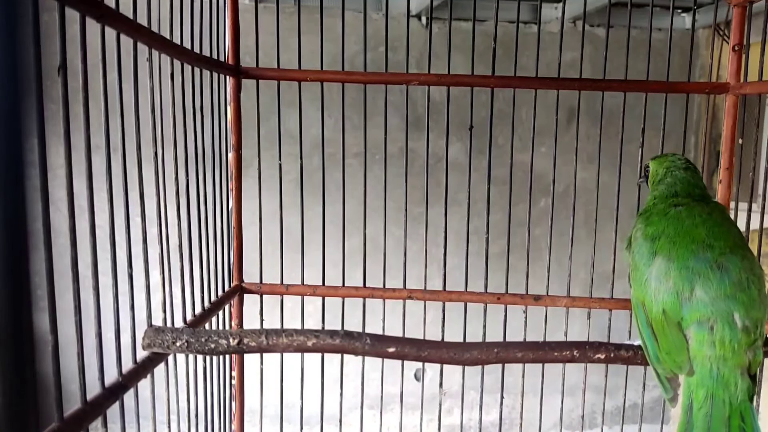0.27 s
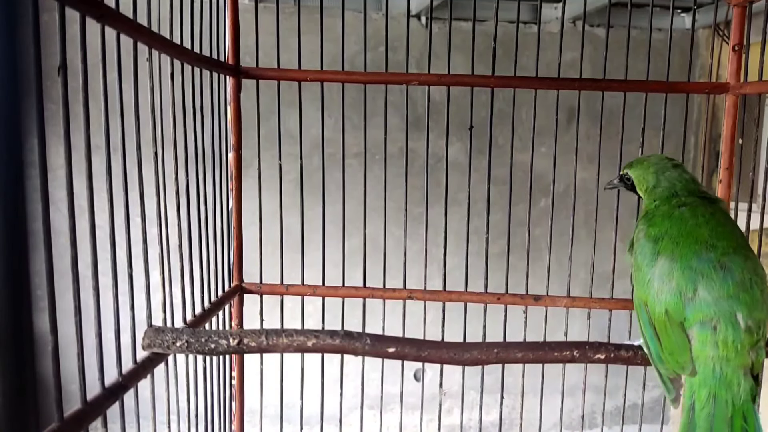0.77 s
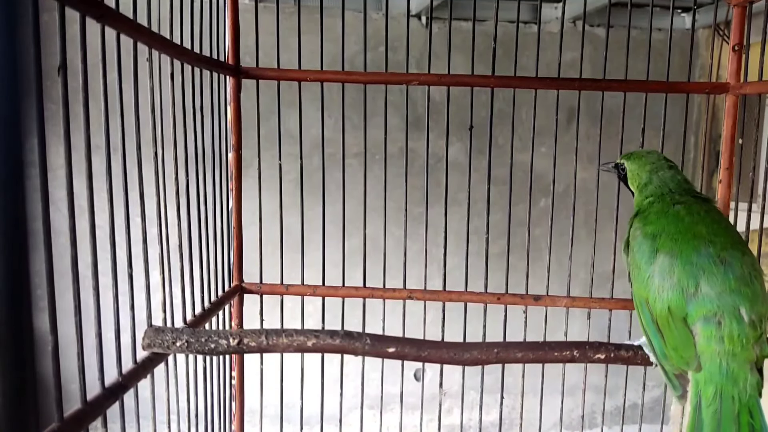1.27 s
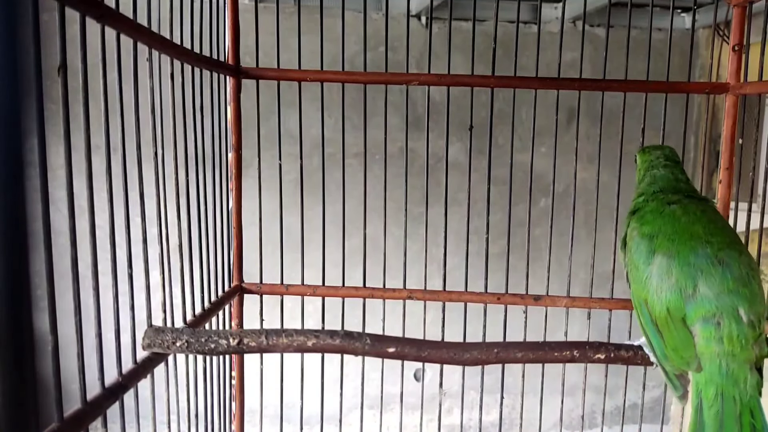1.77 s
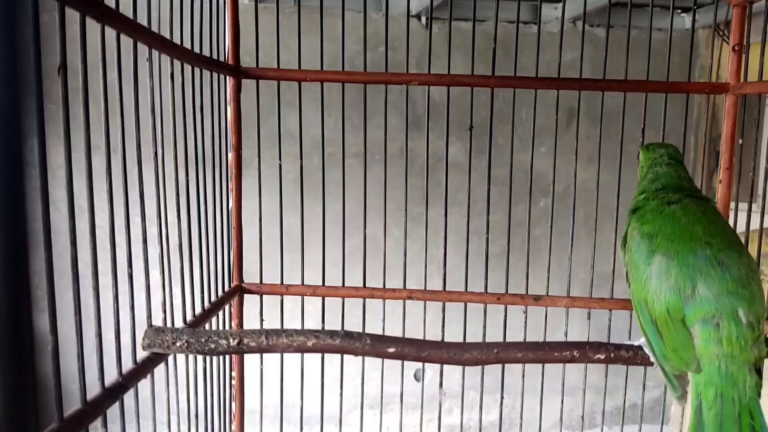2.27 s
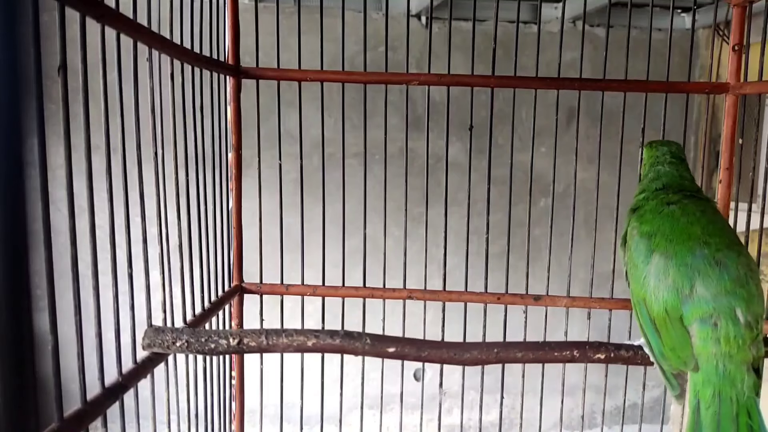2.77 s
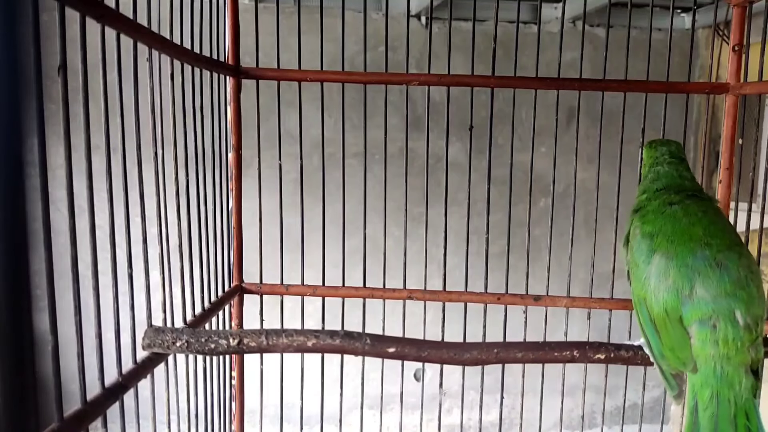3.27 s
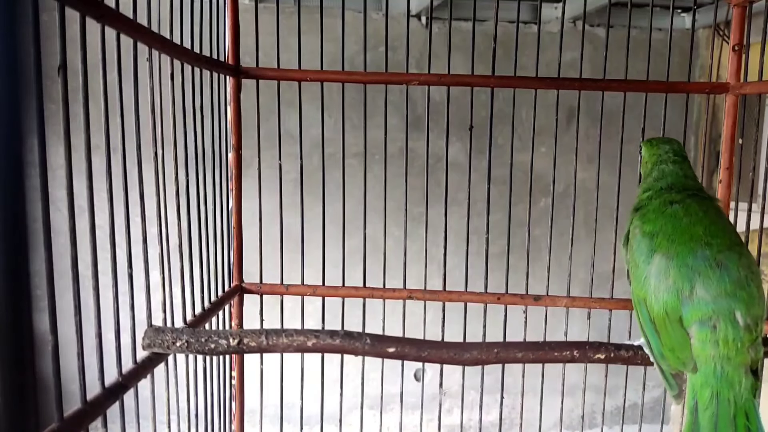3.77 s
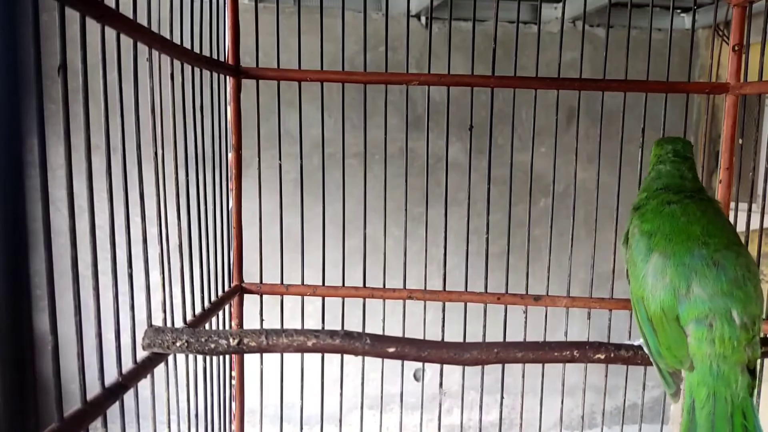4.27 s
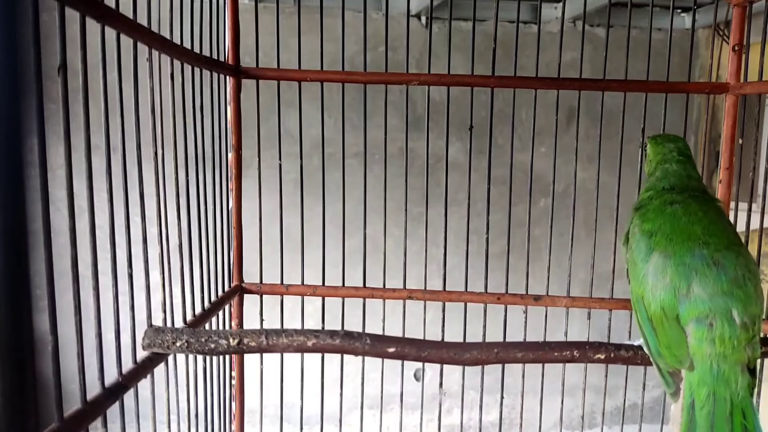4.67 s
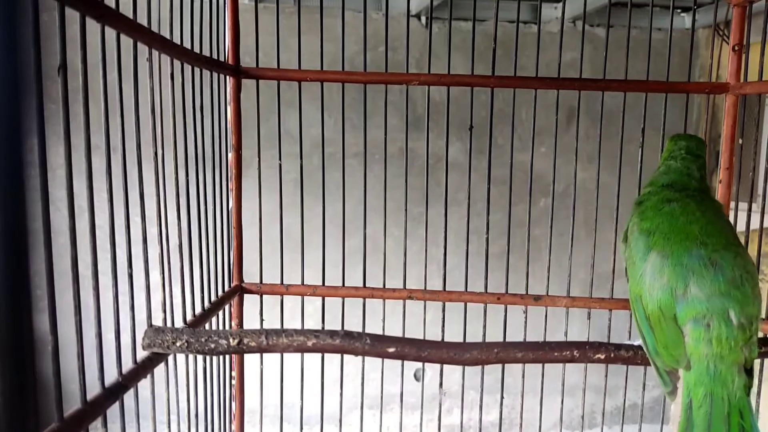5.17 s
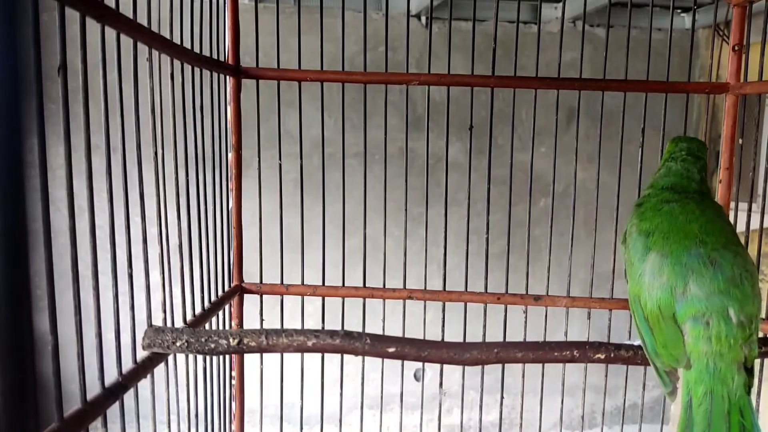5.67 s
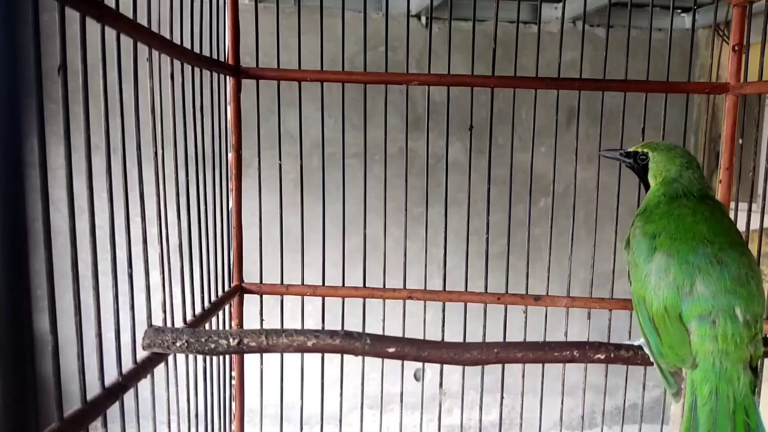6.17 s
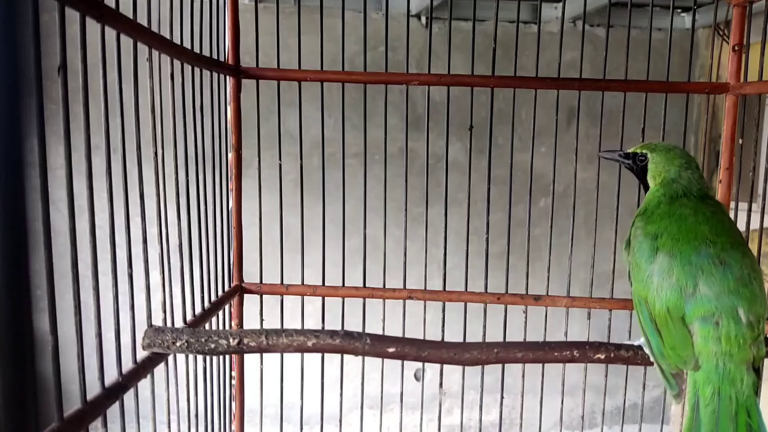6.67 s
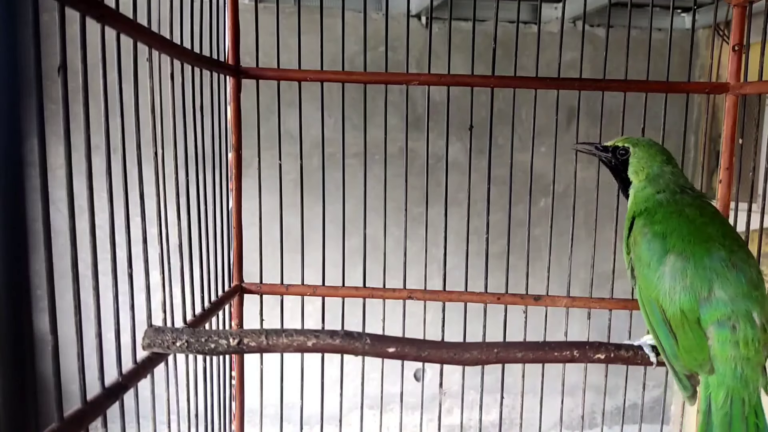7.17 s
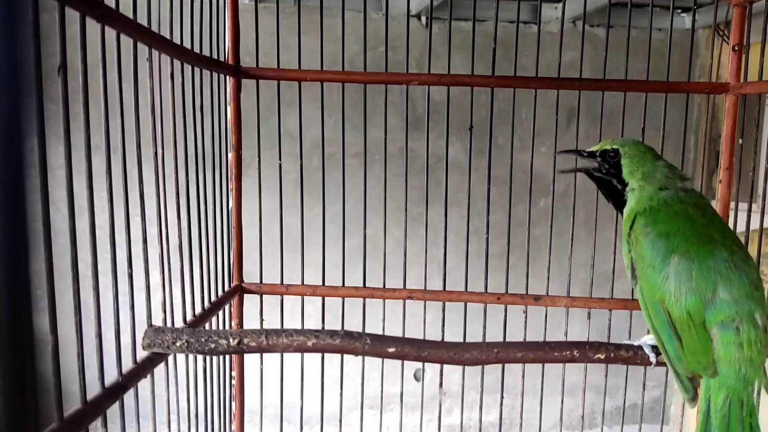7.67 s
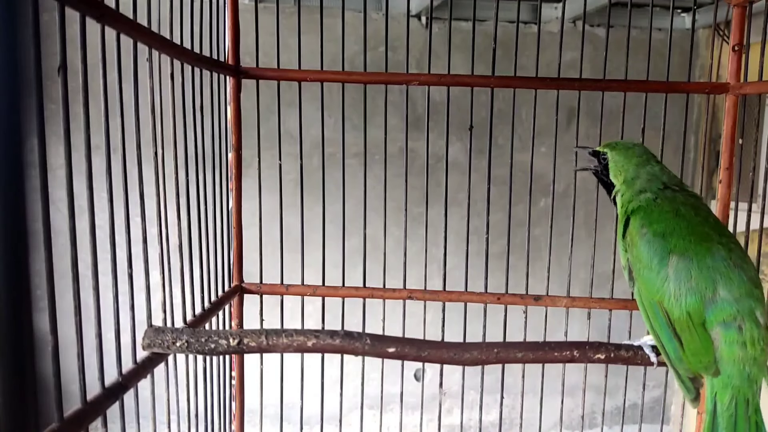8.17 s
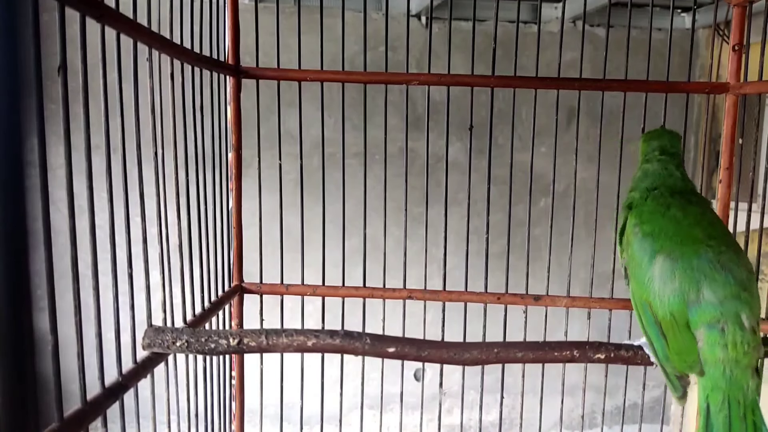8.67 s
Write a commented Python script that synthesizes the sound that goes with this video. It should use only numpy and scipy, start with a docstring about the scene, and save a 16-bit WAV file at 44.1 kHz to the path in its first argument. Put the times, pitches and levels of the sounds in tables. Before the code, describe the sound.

Close bird song on a quiet porch: a chip, a steady string of short chups, silence, a plunging squeal, then fast loud upward double whistles.

```python
"""Caged leafbird on a porch

A leafbird sings close to the microphone: a sharp chip, eight short arched chups, a pause, a squeal that
drops to a whistle, then three loud pairs of rising whips. Each note is a gliding sine with beak-shaped
overtones and breath noise, answered by hard walls made of decaying noise. Rustles of shaped noise come from
the perch, smeared tones from far off, and steady sines under coloured noise make a distant machine in
the open air. The recorder's limiter ducks around the loudest notes."""
import sys
import numpy as np
from scipy import signal
from scipy.fft import rfft, irfft, next_fast_len
from scipy.io import wavfile
from scipy.ndimage import uniform_filter1d, minimum_filter1d, map_coordinates

SR = 44100
rng = np.random.default_rng(int(sys.argv[2]) if len(sys.argv) > 2 else 0)


def pcm_store(signal):
    """Save signal as 16-bit PCM."""
    levels = np.round(np.clip(np.atleast_2d(signal), -1, 1) * 32767)
    wavfile.write(sys.argv[1], SR, levels.astype(np.int16).T)


N = 393372  # length in samples

# Colour of the outdoor rumble. Each row: frequency in Hz, relative density in dB per Hz.
RUMBLE_COLOUR = [(15, -44), (28, -7), (42, 1), (58, -9), (72, -29), (87, -0.5), (151, -6.5), (183, -5.5),
                 (212, -4.5), (289, -5.5), (517, -13), (788, -12), (1200, -16), (1560, -35), (2640, -120)]
# Colour of the outdoor hiss. Each row: frequency in Hz, relative density in dB per Hz.
HISS_COLOUR = [(710, -78), (1200, -5.5), (1430, 0), (1920, -3.5), (2170, -3.5), (3730, -4.5), (4310, -7.5),
               (7800, -7), (9300, 0), (14400, -17.5)]
# How alike the air sounds left and right. Each row: frequency in Hz, likeness from -1 to 1.
AIR_LIKENESS = [(60, 0.59), (150, 1), (370, 0.67), (920, -0.11), (2280, -0.096), (5670, -0.07),
                (14100, 0.14)]
# Tones of the distant machine. Each row: frequency in Hz, rms level in dB before the hum trim.
MACHINE_TONES = [(101, -57), (129.2, -56), (183.0, -54.5), (667.5, -61.5), (764.4, -61)]
# Faint far-off tones. Each row: centre in seconds, length at half height in seconds, frequency in Hz,
# rate of blurring in knots per second, level at the centre in dB.
DISTANT_TONES = [(0.786, 0.075, 895, 18, -55), (.83, 0.15, 668, 9, -52), (1.45, 0.051, 583, 32, -47.5),
                 (1.58, 0.087, 434, 24, -51), (1.685, .08, 405, 21, -53), (3.77, .06, 480, 20, -51.5),
                 (3.882, .08, 439, 18, -50), (3.98, .1, 810, 73, -48.5), (1.275, 0.043, 9000, 1100, -46)]
# Feathers and feet. Each row: centre in seconds, length at half height in seconds, level at the centre in dB.
PERCH_SHUFFLES = [(0.249, 0.088, -46), (.44, 0.1, -42), (1.434, 0.061, -47), (2.281, 0.077, -48.5),
                  (4.85, 0.08, -47), (6.3, 0.077, -45), (8.411, 0.088, -41)]
# Colour of the rustles. Each row: frequency in Hz, relative level in dB.
FEATHER_COLOUR = [(200, -6), (600, 7), (1500, -5), (3800, -2.5), (6000, -7.5), (9000, 0), (11500, -4.5),
                  (14000, -25)]
# Decay of the porch's tail. Each row: frequency in Hz, time to fall 60 dB in seconds.
PORCH_DECAY = [(500, 0.075), (2000, 0.56), (4000, 0.5), (9000, 0.4), (14000, 0.6)]
# The beak aims its treble at the walls. Each row: frequency in Hz, boost of the echoes in dB.
BEAK_BEAM = [(2000, 4.5), (4000, 7), (8000, 12), (12000, 7)]
# Overtones of the syrinx. Each row: multiple of the pitch, relative level in dB.
OVERTONE_LEVELS = [(2, 6.5), (3, -2.5), (4, -6), (5, -6), (6, -17.5), (7, -16)]
# What the beak lets out of the overtones. Each row: frequency in Hz, gain in dB.
BEAK_GAIN = [(3300, -32.5), (3900, -36.5), (4500, -36.5), (5500, -46.5), (6300, -31.5), (7100, -32.5),
             (7800, -21.5), (9000, -16.5), (10800, -9.5), (12500, -27.5), (13500, -30), (14500, -32)]
# Colour of the air noise in the song. Each row: frequency in Hz, relative level in dB.
RASP_COLOUR = [(400, -30), (1000, -3.5), (2400, 4), (3500, -3), (5500, 5), (7200, -9), (8300, 15.5),
               (11000, 13), (12500, -18), (14000, -20)]
# Colour of the rush of air that starts a note. Each row: frequency in Hz, relative level in dB.
SCRATCH_COLOUR = [(400, -16), (900, -10.5), (1600, -1), (2300, 8), (2900, -5), (6500, -17), (9000, -9),
                  (14000, -19)]
# Microphone colour. Each row: frequency in Hz, left-right difference in dB.
PORT_COLOUR = [(2500, 1), (4000, 2.5), (7700, -9.5), (10000, 1), (13000, 10.5)]
# The two sides of the syrinx in the chip. Each row: start pitch in Hz, settled pitch in Hz,
# level in dB on top of the chip's force, overtones in dB.
SYRINX_SIDES = [(2700, 1820, 0.5, 1), (2950, 2100, -1, -8)]
# Loudness of the chip. Each row: time in seconds, level in dB.
CHIP_LOUDNESS = [(0.961, -46), (0.965, -26), (0.975, -15.5), (0.991, -15), (0.999, -25.5), (1.017, -19.5),
                 (1.027, -24)]
# The chups. Each row: time of the highest point in seconds, top pitch in Hz, level in dB,
# scoop before the top in seconds ahead of stretching, length factor, overtones in dB,
# left-right difference in dB, air noise in dB, upturn relative to the chup in dB.
CHUP_NOTES = [(1.534, 1890, -15, 0.017, 0.92, 3.5, 5.5, -26, -24),
              (2.155, 1904, -14.3, 0.019, 0.84, 4, 3.5, -26, -37),
              (2.681, 1933, -14, 0.018, 0.9, 3.5, 5, -23.5, -25),
              (3.163, 1883, -12, 0.016, 0.87, 3.5, 2, -22.5, -17),
              (3.644, 1929, -13, 0.019, 1.02, 4.5, 4.5, -21, -25),
              (4.135, 1934, -14.5, .022, 1.03, 4, 5, -19, -14),
              (4.551, 1886, -13.5, 0.019, 0.93, 5, 1.5, -24, -12.5),
              (5.043, 1864, -15.5, .025, 1, 5, 5, -22.5, -12.5)]
# Path of the squeal. Each row: time in seconds, pitch in Hz, level in dB before the squeal's lift.
SQUEAL_PATH = [(6.84, 3606, -33), (6.858, 3840, -24.5), (6.884, 3915, -23.5), (6.9, 3851, -40),
               (6.916, 3800, -25.5), (6.926, 3660, -20), (6.932, 3404, -18), (6.94, 2880, -12.5),
               (6.958, 2390, -33)]
# Held whistles under the squeal's start and after its drop. Each row: start in seconds, length in seconds,
# pitch in Hz, level in dB, swell in dB, overtones in dB, left-right difference in dB, air noise in dB.
HELD_WHISTLES = [(6.833, 0.024, 2965, -14.5, -2, 3, -2, -25), (6.962, 0.077, 2123, -15.5, 16, -2, 0, -25)]
# The rising whips, in pairs. Each row: start in seconds, length in seconds, start pitch in Hz,
# climb in Hz per second, final bend in Hz, level in dB before the throat, overtones in dB,
# left-right difference in dB, air noise in dB, opening scratch in dB.
WHIP_NOTES = [(7.526, 0.088, 1593, 16980, -410, -5.5, -1, -4, -40, -29.5),
              (7.65, 0.072, 1705, 17170, 89, -2.5, -3.5, -2.5, -32, -35),
              (8.121, .085, 1626, 17660, -490, -5.5, 0, -1, -47, -24.5),
              (8.228, 0.065, 1897, 15300, 125, -4, -2, -4, -48, -48),
              (8.579, 0.11, 1559, 14510, -100, -4.5, -2, -0.5, -28, -26.5),
              (8.708, 0.082, 1693, 15440, 370, -4.5, -6.5, -5.5, -25, -46)]
# A whip is loudest where it meets the throat's resonance. Each row: pitch in Hz, gain in dB.
THROAT_GAIN = [(1600, -15), (1780, -13), (2080, -12.5), (2260, -1.5), (2450, -2.5), (2650, -2), (2850, -5),
               (3150, -10)]

TOP_HZ = 14400  # band limit
RUMBLE_DB, HISS_DB, HUM_TRIM_DB = -46, -50, -0.5
UNSTEADY = .004  # share by which the pitch trembles
FADE_DB = 23.5  # chups, whistles and whips swell from, and die to, this far under their level
CHIP_SETTLE_S = .006  # time constant of the drop onto the settled pitches
CHIP_WAVER, CHIP_WAVER_PER_S = .04, 130  # share by which each side's pitch wanders, and how often
# All times of a chup, here and below, are before stretching; slopes are shares of its top pitch.
CHUP_RISE_PER_S, CHUP_FALL_PER_S, CHUP_ROUND_S = 18, 11, 0.0088  # arms of the arch, rounded crown
CHUP_FALL_S = 0.024  # from the highest point to the end
CHUP_ATTACK_SHARE = 0.58  # part of the scoop over which the voice swells
CHUP_RELEASE_S = 0.0063
UPTURN_AT_S, UPTURN_S, UPTURN_FADE_S = .017, 0.024, 0.0083  # starts this long after the highest point
UPTURN_FROM, UPTURN_TO = .84, 1.23  # pitch as shares of the top
SQUEAL_LIFT_DB = 7
WHISTLE_ATTACK_S, WHISTLE_RELEASE_S = 0.0093, 0.0071
WHIP_ATTACK_S, WHIP_RELEASE_S = 0.011, 0.0068
WHIP_BEND_POWER = 7.28  # the higher the power, the later the bend


def amp(db):
    """Decibels to gain."""
    return 10 ** (np.asarray(db) / 20)


def unit(x):
    """Scaled to rms 1."""
    return x / np.sqrt(np.mean(x ** 2) + 1e-20)


def along(points, hz):
    """Read a curve of (Hz, value) points on a log frequency axis."""
    f, v = np.transpose(points)
    return np.interp(np.log(hz + 1), np.log(f + 1), v)


def wobble(rate, size):
    """A smooth random curve, rate knots a second."""
    knots = rng.standard_normal(int(size * rate / SR) + 4)
    return map_coordinates(knots, [np.arange(size) * rate / SR])


def filtered(x, response):
    """Shape the spectrum of x by a response of frequency."""
    size = x.shape[-1]
    m = next_fast_len(size + 4096)
    return irfft(rfft(x, m) * response(np.fft.rfftfreq(m, 1 / SR)), m)[..., :size]


def noise(spectrum, size):
    """Two unrelated coloured noises, scaled together to rms 1."""
    return unit(filtered(rng.standard_normal((2, size)), lambda hz: amp(along(spectrum, hz))))


def add(track, s, x):
    """Mix x into the track from time s."""
    start = max(round(s * SR), 0)
    part = x[..., :max(N - start, 0)]
    track[:, start:start + part.shape[-1]] += part


def moments(length, count=128):
    """Evenly spaced times through a note."""
    return np.linspace(0, length, count)


def envelope(t, attack, release):
    """Attack, hold and release of a note, in dB."""
    swell = np.maximum(1 - t / attack, 0)
    dying = np.maximum(1 - (t[-1] - t) / release, 0)
    return -FADE_DB * (swell + dying)


def air(spectrum):
    """Stereo noise whose two sides share or part company by frequency, built from mid and side."""
    def turn(hz):
        return np.arccos(np.clip(along(AIR_LIKENESS, hz), -1, 1)) / 2

    mid, side = filtered(noise(spectrum, N), lambda hz: np.array([np.cos(turn(hz)), np.sin(turn(hz))]))
    return np.array([mid + side, mid - side]) / np.std(mid)


def machine_hum(waver=0.66):
    """A distant machine: steady sines, each with its own slow swell and wavering phase."""
    t = np.arange(N) / SR
    hum = 0
    for hz, db in MACHINE_TONES:
        swell_db = 2 * wobble(5, N)
        tone = np.sin(2 * np.pi * hz * t + waver * wobble(16, N))
        hum = hum + amp(db + HUM_TRIM_DB + swell_db) * np.sqrt(2) * tone
    return hum


def background(drift_db=0.5):
    """Outdoor rumble that drifts slightly in level, steady hiss, and the machine's hum."""
    rumble = amp(RUMBLE_DB + drift_db * wobble(5.1, N)) * air(RUMBLE_COLOUR)
    hiss = amp(HISS_DB) * air(HISS_COLOUR)
    return rumble + hiss + machine_hum()


def far_tones():
    """Brief narrow sounds from the neighbourhood, blurred by distance: carriers with random modulation."""
    out = np.zeros((2, N))
    for s, length, hz, width, db in DISTANT_TONES:
        size = int(2 * length * SR)
        blur = wobble(width, size) + 1j * wobble(width, size)
        carrier = np.exp(2j * np.pi * hz * np.arange(size) / SR)
        add(out, s - length, amp(db) * np.hanning(size) * unit(np.real(blur * carrier)))
    return out


def shuffles(flutter_db=3):
    """Soft uneven rustles as the bird shifts on its perch: feather-coloured noise that flutters in level."""
    out = np.zeros((2, N))
    for s, length, db in PERCH_SHUFFLES:
        size = int(2 * length * SR)
        rustle = unit(noise(FEATHER_COLOUR, size) * amp(flutter_db * wobble(97.6, size)))
        add(out, s - length, amp(db) * np.hanning(size) * rustle)
    return out


def porch(x, near_db=-13, near_t60=0.019, wall_db=-21.0, wall_delay=0.021, wall_t60=0.15,
          late_db=-13, gap=0.0052):
    """Cage and eaves answer at once, the facing wall a moment later, then a tail; each call a new pattern."""
    size = SR * 3 // 4
    # the tail: noise that dies at its own pace in each band
    hz, t, z = signal.stft(rng.standard_normal((2, size)), SR, nperseg=256)
    decay = amp(-60 * t / along(PORCH_DECAY, hz)[:, None])
    late = signal.istft(z * decay, SR, nperseg=256)[1][:, :size]
    t = np.arange(size) / SR

    def flurry(delay, t60):
        return unit(rng.standard_normal((2, size)) * amp(-60 * t / t60) * (t > delay))

    near = amp(near_db) * flurry(gap, near_t60)
    wall = amp(wall_db) * flurry(wall_delay, wall_t60)
    tail = amp(late_db) * unit(late * np.minimum(t / wall_delay, 1))
    answer = (near + wall + tail) / np.sqrt(size)
    answer = filtered(answer, lambda hz: amp(along(BEAK_BEAM, hz)))
    return signal.fftconvolve(x[None], answer, axes=1)


def sing(contour, overtone_db, pan_db, rasp_db, scratch_db, growth, bloom_db, tilt_db, lead,
         scratch_length=.03, flutter_db=5.5):
    """A gliding syrinx tone with overtones shaped by the beak, a little air noise, and its echoes."""
    s, hz, db = np.transpose(contour)
    t = np.arange(s[0] - scratch_length / 2, s[-1], 1 / SR)
    size = len(t)
    glide = uniform_filter1d(np.interp(t, s, hz), size=120, mode="nearest")
    pitch = glide * (1 + UNSTEADY * wobble(624.6, size))
    force = amp(np.interp(t, s, db)) * np.clip((t - s[0]) / .002, 0, 1)
    phase = 2 * np.pi * np.cumsum(pitch) / SR

    middle = np.mean([k for k, _ in OVERTONE_LEVELS])  # tilt_db tips the overtones about this multiple
    upper = 0
    for k, level in OVERTONE_LEVELS:
        flicker_db = flutter_db * wobble(197.6, size)
        gain = amp(level + tilt_db * (k - middle) + along(BEAK_GAIN, k * pitch) + flicker_db)
        upper = upper + gain * np.sin(round(k) * phase) * (k * pitch < SR / 2)
    edge = upper + amp(rasp_db) * noise(RASP_COLOUR, size)[0]

    # overtones follow the force by a power law and bloom as the beak opens
    bloom = amp(overtone_db + bloom_db * np.linspace(-1, 0, size))
    brightness = bloom * (force / force.max()) ** growth
    # air scratches through the syrinx, strongest as the tone catches
    opening = np.sin(np.pi * np.minimum((t - t[0]) / scratch_length, 1)) ** 2
    scratch = amp(scratch_db) * opening * noise(SCRATCH_COLOUR, size)[0]
    voice = force * np.sin(phase) + force.max() * (brightness * edge + scratch)
    voice = np.sqrt(2) * voice * signal.windows.tukey(size, .04)

    sound = porch(voice)
    # the direct sound reaches the left port first, by lead seconds
    direct = np.array([voice, np.interp(t - lead, t, voice)])
    sound[:, :size] += amp([[pan_db / 2], [-pan_db / 2]]) * direct
    return t[0], sound


def chip():
    """Both sides of the syrinx drop onto different pitches, waver, and beat roughly against each other."""
    s, force_db = np.transpose(CHIP_LOUDNESS)
    t = np.arange(int((s[-1] - s[0]) * SR)) / SR
    for start_hz, settled_hz, db, overtone_db in SYRINX_SIDES:
        pitch = settled_hz + (start_hz - settled_hz) * np.exp(-t / CHIP_SETTLE_S)
        pitch = pitch * (1 + CHIP_WAVER * wobble(CHIP_WAVER_PER_S, len(t)))
        contour = np.column_stack([s[0] + t, pitch, db + np.interp(s[0] + t, s, force_db)])
        yield sing(contour, overtone_db, pan_db=0.5, rasp_db=-17.5, scratch_db=-52,
                   growth=0.51, bloom_db=11, tilt_db=5.5, lead=.0001)


def chups():
    """Every chup scoops up into the same arch, stretched and transposed, with a quick upturn as it lets go."""
    v = moments(UPTURN_S)
    rise = np.linspace(UPTURN_FROM, UPTURN_TO, len(v))
    upturn = np.column_stack([UPTURN_AT_S + v, rise, envelope(v, UPTURN_FADE_S, UPTURN_FADE_S)])
    for s, top_hz, db, scoop, stretch, overtone_db, pan_db, rasp_db, upturn_db in CHUP_NOTES:
        t = moments(scoop + CHUP_FALL_S)
        off = t - scoop
        slope = np.where(off < 0, CHUP_RISE_PER_S, CHUP_FALL_PER_S)
        sag = slope * (np.hypot(off, CHUP_ROUND_S) - CHUP_ROUND_S)
        fades = envelope(t, CHUP_ATTACK_SHARE * scoop, CHUP_RELEASE_S)
        arch = np.column_stack([off, 1 - sag, fades])
        for shape, extra_db in (arch, 0), (upturn, upturn_db):
            contour = shape * [stretch, top_hz, 1] + [s, 0, db + extra_db]
            yield sing(contour, overtone_db, pan_db, rasp_db, scratch_db=-28,
                       growth=0.53, bloom_db=11.5, tilt_db=3, lead=0.00012)


def squeal():
    """A high thin note that bends up, then plunges in pitch, loudest near the bottom of its fall."""
    contour = np.array(SQUEAL_PATH) + [0, 0, SQUEAL_LIFT_DB]
    yield sing(contour, overtone_db=-7.5, pan_db=2.5, rasp_db=-17.5, scratch_db=-47,
               growth=0.34, bloom_db=0.5, tilt_db=-3.5, lead=.0001)


def whistles():
    """Notes held on one pitch while their level swells or fades."""
    for s, length, hz, db, swell_db, overtone_db, pan_db, rasp_db in HELD_WHISTLES:
        t = moments(length)
        level = db + swell_db * (t / length - .5) + envelope(t, WHISTLE_ATTACK_S, WHISTLE_RELEASE_S)
        contour = np.column_stack([s + t, np.full(len(t), hz), level])
        yield sing(contour, overtone_db, pan_db, rasp_db, scratch_db=-46,
                   growth=.66, bloom_db=0.0, tilt_db=0, lead=.0001)


def whips():
    """Pitch climbs through the throat's resonance; late on, the first of a pair bends down, the second up."""
    for s, length, start_hz, climb, bend_hz, db, overtone_db, pan_db, rasp_db, scratch_db in WHIP_NOTES:
        t = moments(length)
        pitch = start_hz + climb * t + bend_hz * (t / length) ** WHIP_BEND_POWER
        level = db + along(THROAT_GAIN, pitch) + envelope(t, WHIP_ATTACK_S, WHIP_RELEASE_S)
        contour = np.column_stack([s + t, pitch, level])
        yield sing(contour, overtone_db, pan_db, rasp_db, scratch_db,
                   growth=0.58, bloom_db=4.0, tilt_db=1.5, lead=.000095, scratch_length=.055)


def song():
    """All the notes in turn, heard through two microphone ports of unequal treble."""
    out = np.zeros((2, N))
    for notes in chip, chups, squeal, whistles, whips:
        for s, sound in notes():
            add(out, s, sound)
    return filtered(out, lambda hz: amp(np.outer([.5, -.5], along(PORT_COLOUR, hz))))


def scene():
    """The bird in front of its surroundings."""
    return background() + far_tones() + shuffles() + song()


def record(dry, ceiling_db=-1, hold=0.21):
    """A limiter ducks both sides around each peak; nothing is kept above the band limit."""
    needed = np.minimum(1, amp(ceiling_db) / (np.abs(dry).max(axis=0) + 1e-9))
    size = int(hold * SR)
    # hold the lowest gain around each moment, then smooth it
    gain = uniform_filter1d(minimum_filter1d(needed, size), size // 2)
    return filtered(dry * gain, lambda hz: hz < TOP_HZ)


dry = scene()
out = record(dry)
pcm_store(out)
```